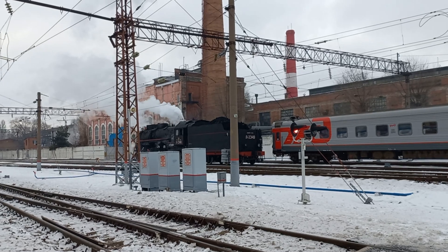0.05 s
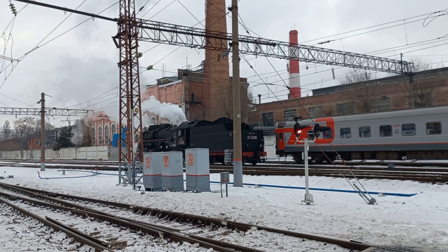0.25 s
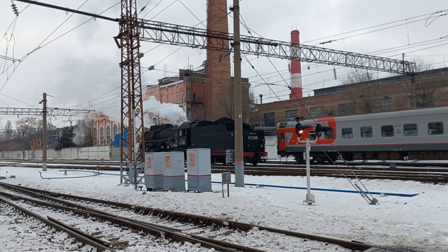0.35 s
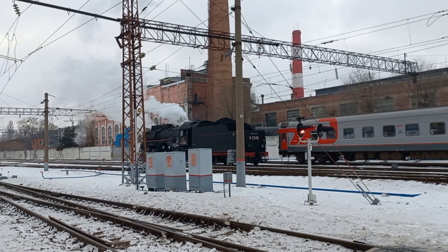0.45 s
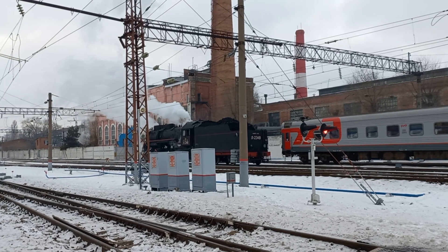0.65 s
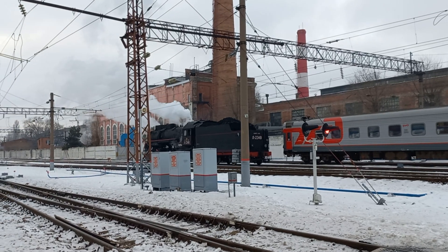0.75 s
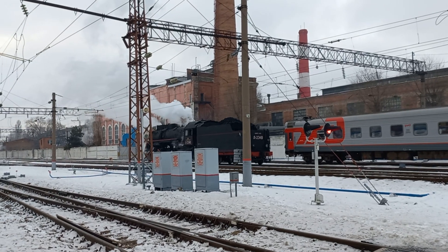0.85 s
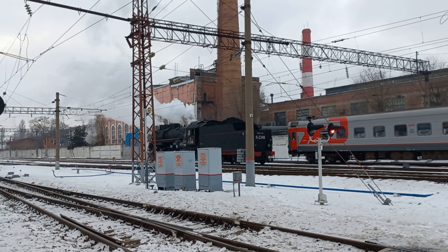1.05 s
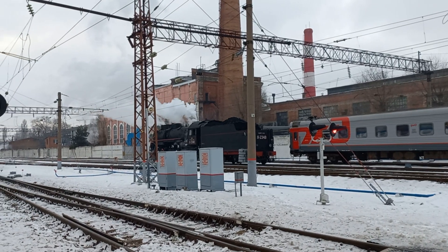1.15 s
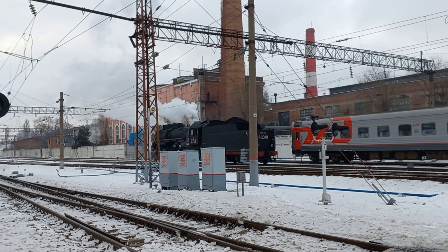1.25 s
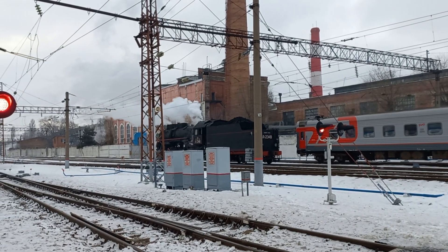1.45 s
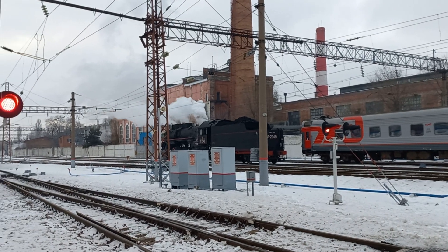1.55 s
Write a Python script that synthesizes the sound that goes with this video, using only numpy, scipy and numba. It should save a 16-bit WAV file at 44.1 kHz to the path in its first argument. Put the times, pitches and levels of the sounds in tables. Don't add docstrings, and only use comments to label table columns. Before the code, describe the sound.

Two harsh train whistle blasts burst over quiet yard rumble and faint machine hum, the second longer; sheds return dull echoes, then a thin air hiss rises amid wind bumps on a handheld stereo phone microphone.

```python
import sys
import numpy as np
from scipy import signal
from scipy.fft import rfft, irfft
from scipy.io import wavfile
from scipy.ndimage import uniform_filter1d
from numba import njit

SR = 44100
rng = np.random.default_rng(int(sys.argv[2]) if len(sys.argv) > 2 else 0)


def to_linear_factor(level_db):
    exponent = np.asarray(level_db, float) / 20
    return 10 ** exponent


def dump_mix(stems):
    frames = np.atleast_2d(stems).T
    limited = np.clip(frames, -1, 1)
    pcm = np.round(limited * 32767).astype(np.int16)
    wavfile.write(sys.argv[1], SR, pcm)


N = 70560

# f/Hz, level/dB [dB per Hz]
RUMBLE_SPECTRUM = [(25, -34), (75, -7), (180, -11), (520, 1.5), (800, -12), (1950, -10.5), (2700, -18),
                   (15500, -45.5)]
# f/Hz, level/dB
MACHINE_HUMS = [(107.7, -53.5), (522, -59), (1238, -53.5), (1497, -53.5), (1707, -45), (3461, -51.5),
                (5626, -51.5)]
# t/s, level/dB
LEAK_COURSE = [
    (0, -58.5),
    (1.1, -53),
    (1.32, -50),
    (1.35, -42.5),
    (1.45, -46),
    (1.52, -42),
    (1.6, -45),
]
# t/s, level/dB, f/Hz
WIND_KNOCKS = [
    (.07, -32.5, 100),
    (0.161, -36.5, 171),
    (0.221, -32.5, 186),
    (.55, -35, 127),
    (.88, -32.5, 90),
    (1.249, -33, 120.2),
    (1.45, -31, 91.5),
    (1.51, -32, 95),
    (1.585, -29.5, 108.3),
]
# t/s, pitch f/Hz, pressure level/dB
WHISTLE_BLASTS = [
    [(.204, 588.6, -59), (.216, 636, -8.5), (.235, 645.9, 0), (.28, 637.2, 3), (.34, 633.9, 3.5),
     (.375, 632.3, -2), (.41, 627, -10.5), (.45, 628, -20.5), (.48, 631.4, -55)],
    [(.534, 595.7, -35), (.552, 634.8, -3), (.585, 641.2, 1.5), (.65, 634, 3.5), (.715, 626.6, -3),
     (.76, 636.8, 1.5), (.86, 630.9, 2.5), (.94, 629.2, -10), (1.02, 614.4, -32.5)],
]
# multiple/1, level/dB, right microphone level/dB, extra right lag/rad (phone's shadow)
WHISTLE_PARTIALS = [(1, -19.5, -2.5, 0.11), (2, -35, 0, -0.5), (3, -14.5, -5.5, 0.71), (4, -25, -6, -2.3),
                    (5, -25, -6.5, 0.14), (6, -19, -1.5, -0.99), (7, -25.5, -2, -2.3), (8, -29.5, 3, 0.21),
                    (9, -34, 3, 0.54), (10, -29, -13, 0.64), (11, -34, -8, -0.31), (12, -36.5, -21, -2.2),
                    (13, -49, -3, 0), (14, -38.5, -13, -0.5), (15, -38, -18, 0.51), (16, -46.5, 6.5, 0.63),
                    (17, -33.5, -30, -0.51), (18, -45.5, 7.5, 0.5), (19, -42, -1, -0.5),
                    (20, -37, -5, -0.5), (21, -49, -8, 0), (22, -46, -4, 0), (23, -51, -4, 0),
                    (24, -48, -4, 0)]
# f/Hz, level/dB [dB per Hz]
STEAM_SPECTRUM = [(300, -35), (1400, -4.5), (2250, -13.5), (3500, 1), (5200, 1), (8500, -11.5), (11500, -5),
                  (15500, -3.5)]
# delay t/s, level/dB, left minus right level/dB
WALL_ECHOES = [
    (.035, -20.5, 9),
    (.08, -18, 9.5),
    (.125, -17, -9.5),
    (.19, -23, 8),
    (.26, -27, 15),
    (.33, -32.5, -10),
]


def level(x, db):
    return x * to_linear_factor(db) / np.sqrt(np.mean(x ** 2))


def late(x, s):
    return np.interp(np.arange(N) - s * SR, np.arange(N), x, left=0)


def walk(rate):
    k = max(int(SR / rate), 2)
    held = np.repeat(rng.standard_normal(4000), k)[:N + 2 * k]
    smooth = uniform_filter1d(uniform_filter1d(held, k), k)
    return 1.67 * smooth[:N]


def colour(x, table):
    hz, db = np.array(table).T
    f = np.arange(N // 2 + 1) * SR / N + 1
    gain = to_linear_factor(np.interp(np.log(f), np.log(hz), db))
    return irfft(rfft(x) * gain, N)


def band(x, hz, width_hz):
    f = np.arange(N // 2 + 1) * SR / N
    return irfft(rfft(x) * np.exp(-((f - hz) / width_hz) ** 2), N)


def left_right(pan_db):
    return to_linear_factor(np.array([[pan_db], [-pan_db]]) / 2)


def yard(t):
    rumble = 0
    for hz in 30 * 2 ** np.arange(0, 9.1, .5):
        pair = [band(colour(rng.standard_normal(N), RUMBLE_SPECTRUM), hz, hz / 4) for _ in range(2)]
        swell = to_linear_factor(2.0 * walk(3.03) + 2.17 * walk(13.69))
        right = 0.46 * pair[0] + 1.53 * pair[1]
        rumble = rumble + swell * np.array([pair[0], right])
    hums = 0
    for hz, db in MACHINE_HUMS:
        wander = 0.99 * np.array([walk(8.6), walk(7.72)])
        hums = hums + to_linear_factor(db + 1.8 * walk(6.56)) * np.sin(2 * np.pi * hz * t + wander)
    return level(rumble, -31) * left_right(5.5) + 1.14 * hums


def leak(t):
    pair = []
    for _ in range(2):
        high = level(band(rng.standard_normal(N), 13220, 2700), 0)
        low = level(band(rng.standard_normal(N), 6040, 3620), -5)
        pair.append(high + low)
    return np.array(pair) * to_linear_factor(np.interp(t, *np.array(LEAK_COURSE).T))


def wind(t):
    duration_s = 0.0089
    turns = rng.uniform(0, 3, (len(WIND_KNOCKS), 2, 1))
    knocks = 0
    for (s, db, hz), turn in zip(WIND_KNOCKS, turns):
        envelope = to_linear_factor(db) * np.exp(-((t - s) / duration_s) ** 2)
        knocks = knocks + envelope * np.cos(2 * np.pi * hz * (t - s) + turn)
    return left_right(1) * knocks


def whistle(t):
    whistle_db, steam_db = 8, -18.5
    soft_share, full_at = 0.17, 8.1
    jitter, flutter_db, rasp_rad = .0006, 1.0, .025
    puff_depth, steam_width, steam_right_db = 0.62, 0.43, -4
    right_late_s = 22 / 44100

    s, pitch, valve_db = np.vstack(WHISTLE_BLASTS).T
    hz = np.interp(t, s, pitch) * (1 + jitter * walk(117.4))
    press_db = uniform_filter1d(np.interp(t, s, valve_db, left=-99, right=-99), size=99)
    gate = np.clip((press_db + 45) / 20, 0, 1)
    phase = 2 * np.pi * np.cumsum(hz) / SR

    out = np.zeros((2, N))
    for k, db, right_db, lag in WHISTLE_PARTIALS:
        k = round(k)
        share = soft_share + (1 - soft_share) * min((k - 1) / full_at, 1)
        strength = gate * to_linear_factor(db + share * press_db + flutter_db * walk(24.83))
        angle = k * phase + rasp_rad * k * walk(200) - np.array([[0], [lag]])
        out = out + strength * np.cos(angle) * to_linear_factor(np.array([[0], [right_db]]))

    mid, side = (level(colour(rng.standard_normal(N), STEAM_SPECTRUM), steam_db - whistle_db)
                 for _ in range(2))
    puffs = gate * to_linear_factor(press_db) * (1 + puff_depth * np.cos(phase))
    steam_left = mid + steam_width * side
    steam_right = to_linear_factor(steam_right_db) * (mid - steam_width * side)
    out = out + puffs * np.array([steam_left, steam_right])
    return to_linear_factor(whistle_db) * np.array([out[0], late(out[1], right_late_s)])


@njit
def walls(x, lags, gain, damp):
    line, soft, out = np.zeros((8, 8192)), np.zeros(8), np.zeros((2, len(x)))
    for i in range(len(x)):
        total = 0.
        for k in range(8):
            soft[k] += (1 - damp) * (gain[k] * line[k, (i - lags[k]) & 8191] - soft[k])
            total += soft[k]
            out[k % 2, i] += soft[k]
        for k in range(8):
            line[k, i & 8191] = x[i] + soft[k] - total / 4
    return out


def sheds(x):
    t60_s, damp, tail_db = 1.585, 0.66, -17
    dull = signal.lfilter(*signal.butter(1, 2780, fs=SR), x)
    slaps = sum(late(dull, s) * to_linear_factor(db) * left_right(pan_db) for s, db, pan_db in WALL_ECHOES)
    lags = rng.integers(1500, 7000, size=8)
    tail = walls(dull, lags, to_linear_factor(-60 * lags / SR / t60_s), damp)
    return slaps + to_linear_factor(tail_db) * tail


def scene():
    t = np.arange(N) / SR
    background = yard(t) + leak(t) + wind(t)
    blast = whistle(t)
    return background + blast + sheds(blast[0])


@njit
def follow(x, start, up, down):
    e, out = start, np.empty(len(x))
    for i in range(len(x)):
        e += (x[i] - e) * (up if x[i] > e else down)
        out[i] = e
    return out


def top_cut(x):
    return signal.sosfilt(signal.butter(12, 15840, fs=SR, output="sos"), x)


def record(dry):
    top, slope = to_linear_factor(-28.5), 0.47
    attack_s, release_s = 0.071, 2.1
    ceiling = 1.1
    loud = np.sqrt(uniform_filter1d(np.mean(dry ** 2, axis=0), size=200))
    envelope = follow(loud, top, 1 / (attack_s * SR), 1 / (release_s * SR))
    ducked = dry * (top / np.maximum(envelope, top)) ** slope
    mix = ceiling * np.tanh(ducked / ceiling)
    return top_cut(mix)


dry = scene()
out = record(dry)
dump_mix(out)
```